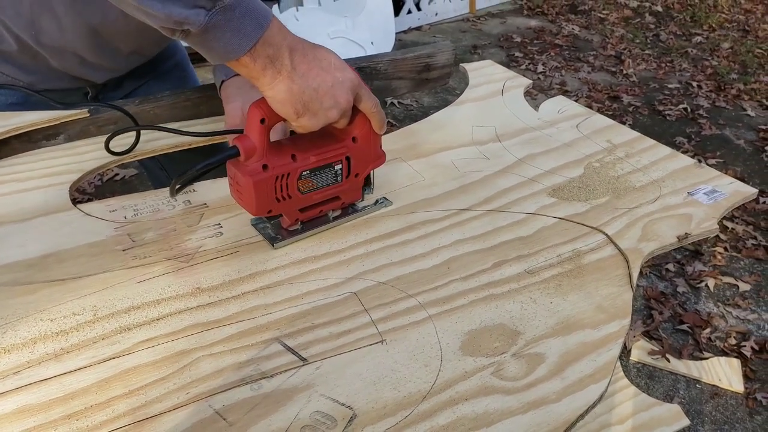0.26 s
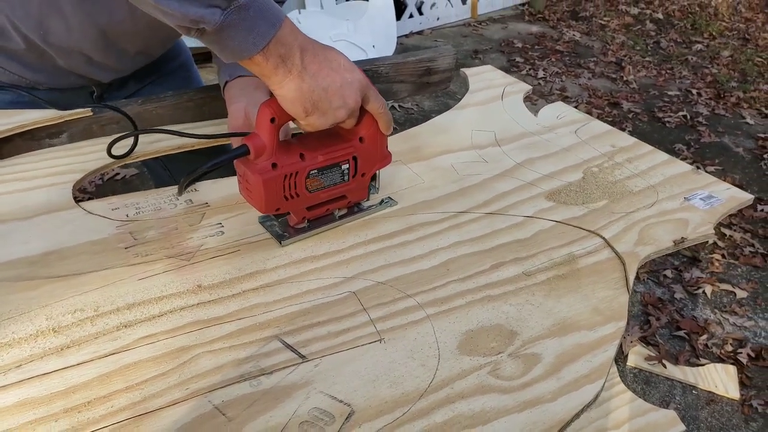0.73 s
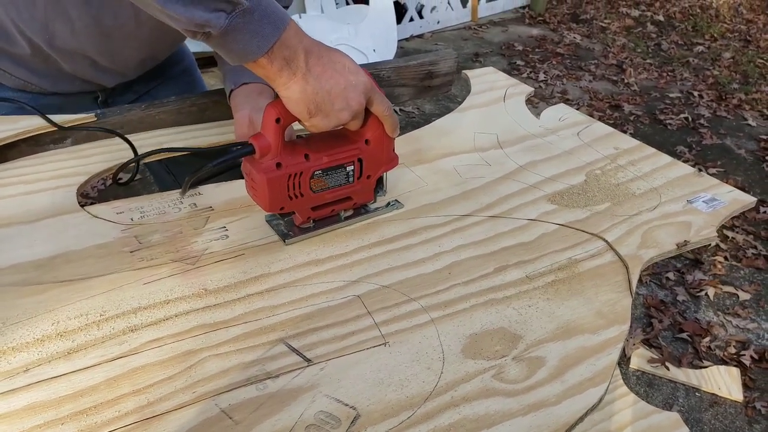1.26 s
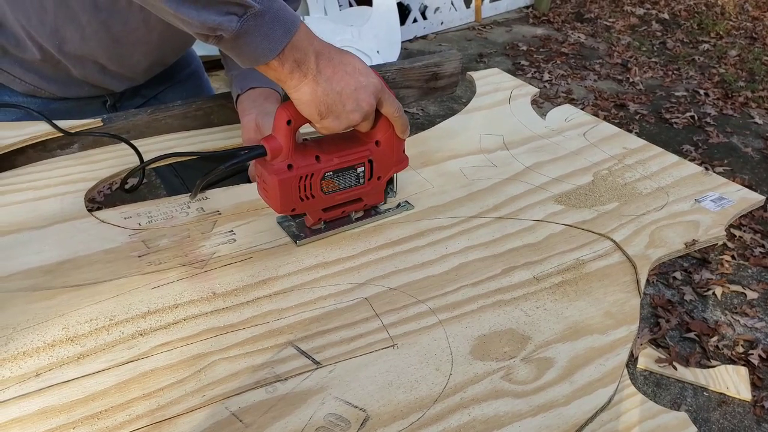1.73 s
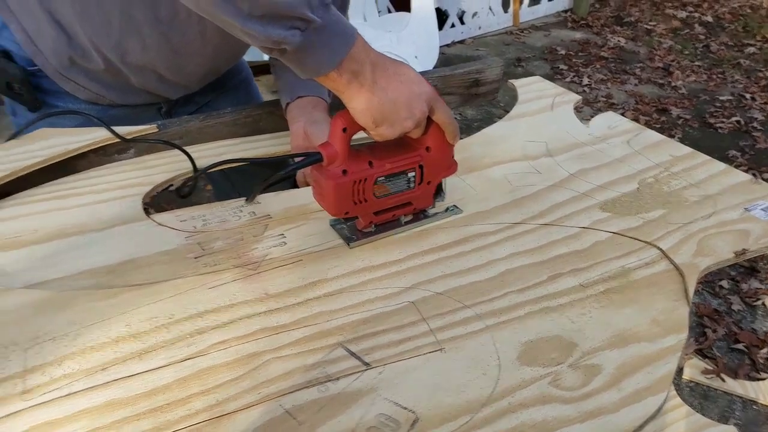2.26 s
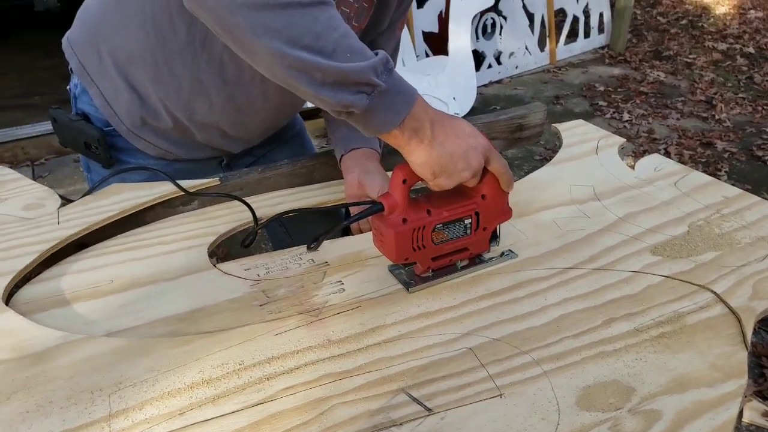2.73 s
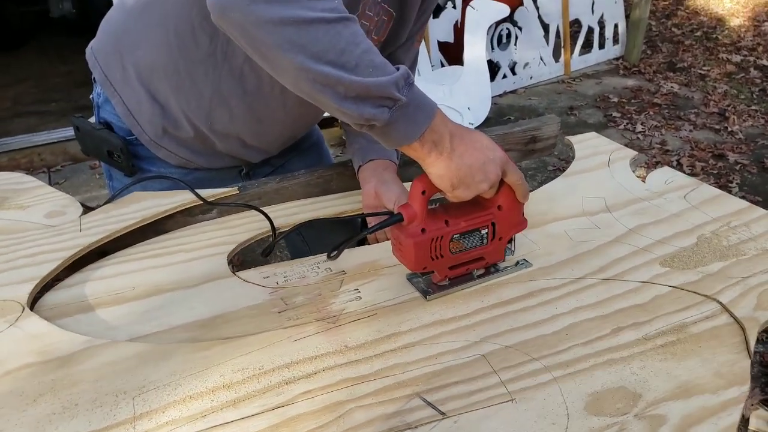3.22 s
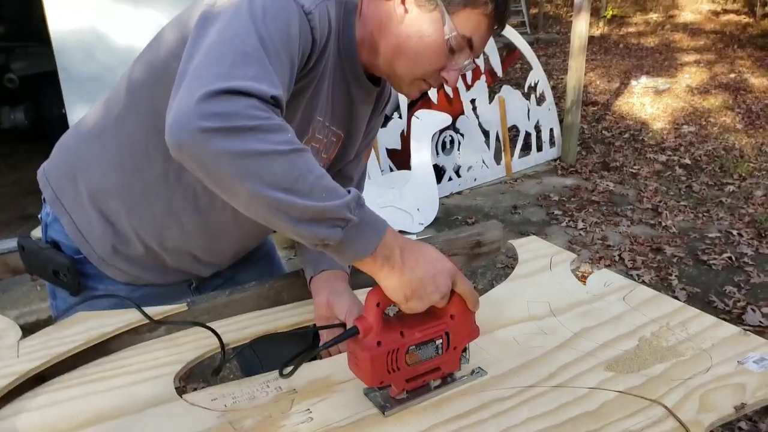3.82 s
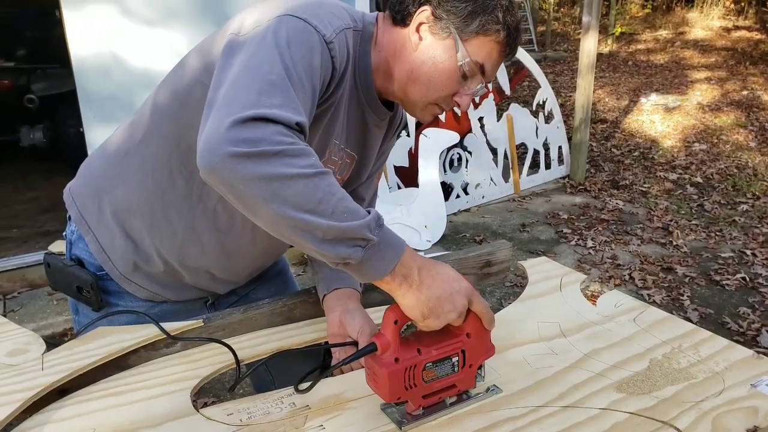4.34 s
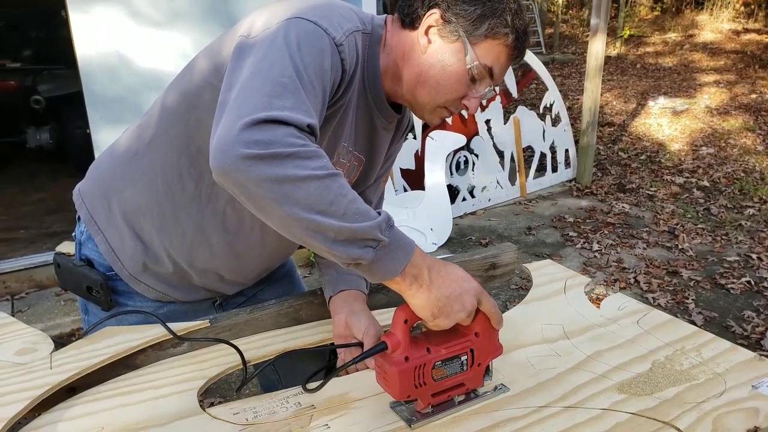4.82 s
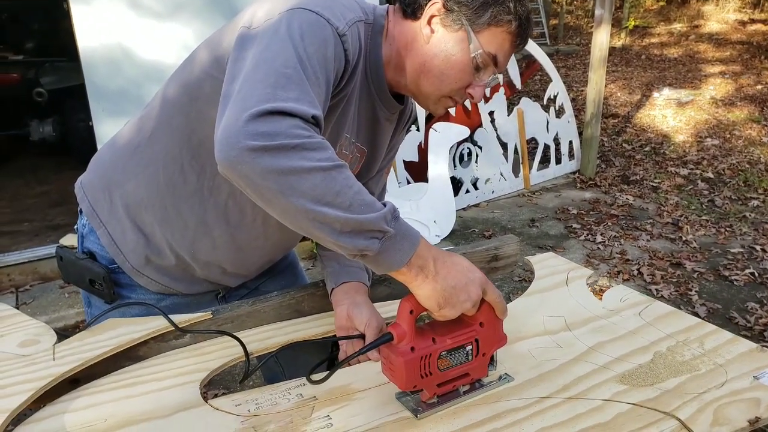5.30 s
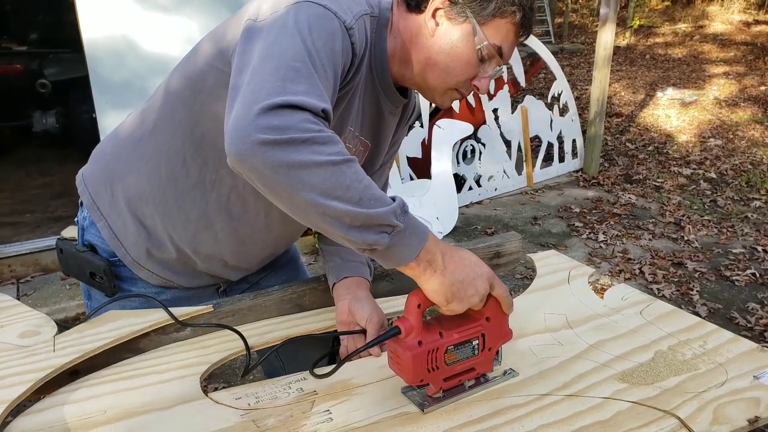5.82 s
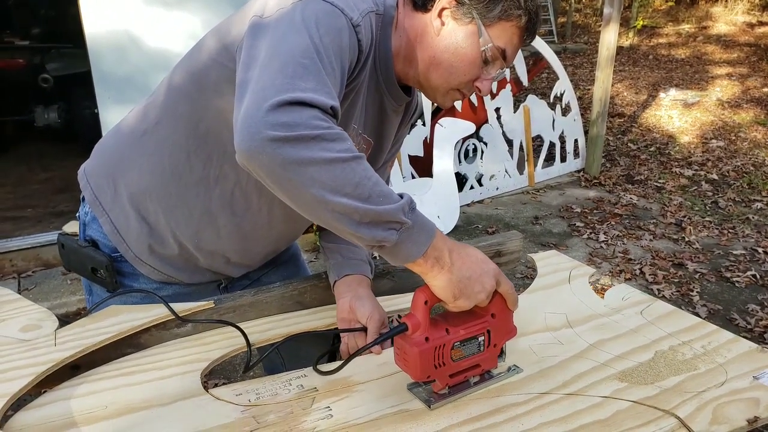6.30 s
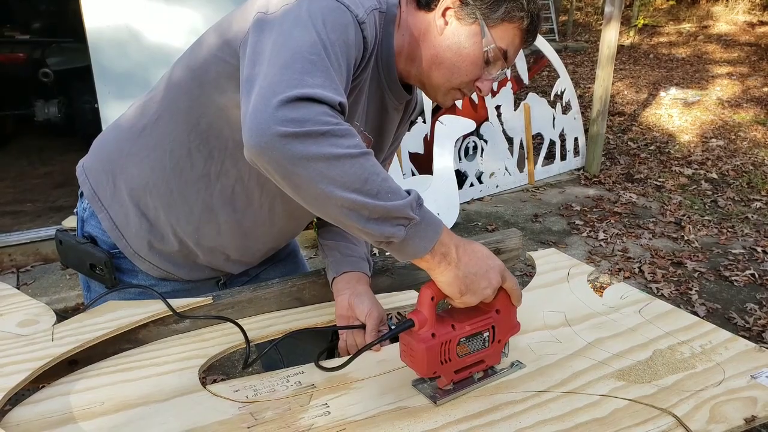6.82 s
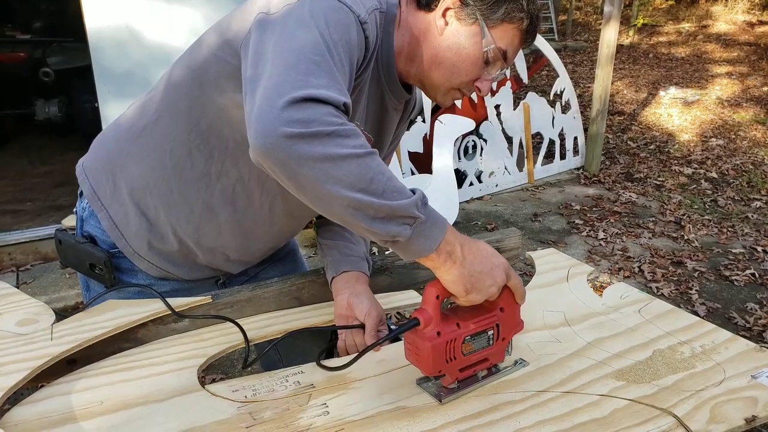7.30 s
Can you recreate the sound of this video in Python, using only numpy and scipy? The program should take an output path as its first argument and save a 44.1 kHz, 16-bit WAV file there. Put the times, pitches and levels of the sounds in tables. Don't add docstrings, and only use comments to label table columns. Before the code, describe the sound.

A corded jigsaw buzzes and whines loudly without stopping, rasping through a plywood sheet outdoors, its motor dipping slightly under load.

```python
import sys
import numpy as np
from scipy import signal
from scipy.io import wavfile
from scipy.ndimage import map_coordinates

SR = 44100
rng = np.random.default_rng(int(sys.argv[2]) if len(sys.argv) > 2 else 0)


def ratio_of_db(decibels):
    return 10 ** (np.asarray(decibels, float) / 20)


def store_pcm(level_fs):
    pcm = np.round(np.clip(level_fs, -1, 1) * 32767).astype(np.int16)
    wavfile.write(sys.argv[1], SR, np.atleast_2d(pcm).T)


N = 332955
MOTOR_TEETH, STROKE_TEETH = 5, 46
SHAFT = STROKE_TEETH / MOTOR_TEETH
FRAME = 2048

# t/s, shaft speed f/Hz, 4th shaft order/dB, 8th shaft order/dB, shaft/dB,
# 3rd stroke order/dB, shoe knock/dB, sheet ring/dB
MOTOR_RUN = [(0.0, 496, -25.5, -32, -40.0, -45, -59, -34.5),
             (0.2, 495.0, -25.5, -31, -41, -46.0, -52, -37.5),
             (0.4, 495, -26.5, -34, -42.0, -44.0, -48, -33.5), (0.48, 493.4, -23, -32, -42, -44, -56, -33),
             (0.56, 490.8, -30, -33, -41.0, -48, -34, -33), (0.7, 486.8, -25, -39, -36, -44.0, -38, -33),
             (0.85, 484.5, -26.5, -41, -43, -50, -40, -31.5), (0.95, 486, -28.0, -34.0, -35, -45, -42, -30),
             (1.05, 489.3, -24.5, -34.0, -37.0, -51, -44, -33),
             (1.2, 493.4, -25, -36.0, -37.5, -44.5, -47, -35.5),
             (1.35, 494.0, -25, -35, -37.5, -48, -55, -33),
             (1.6, 495.2, -25.5, -34, -35.5, -45.5, -53, -36.5),
             (1.8, 495.5, -25.5, -39, -38.0, -49, -63, -34.5), (2.0, 495, -23, -46, -37, -46, -47, -33.5),
             (2.2, 494.9, -26.0, -39, -37.0, -48, -58, -34.0),
             (2.4, 493.6, -29, -30.5, -38.5, -52, -55, -34), (2.6, 492.5, -36, -24, -40.0, -46, -57, -37),
             (2.8, 493.6, -31, -29, -42, -49, -65, -31.5), (3.0, 491.0, -31, -26, -44, -49, -54, -35),
             (3.2, 489.3, -29.0, -25.5, -45, -51.0, -51, -35.5),
             (3.4, 488, -27.5, -27.5, -45, -53, -49, -33.5),
             (3.6, 483.3, -31.5, -28.5, -46.0, -51.0, -48, -31),
             (3.78, 483.8, -31, -36, -46, -54, -52.0, -32),
             (3.86, 480.3, -35.0, -28, -48.0, -47.0, -39, -31),
             (4.0, 480.7, -31.5, -34.0, -49.0, -50, -40.5, -35),
             (4.15, 482.3, -35, -27, -52, -50.0, -41, -32.5),
             (4.3, 484.4, -30.5, -29, -49, -58, -52, -31.5), (4.5, 487, -30.5, -22.5, -52, -55, -54, -32.5),
             (4.7, 489, -33.0, -25, -51, -53.0, -47, -33.0), (4.9, 489.2, -32, -25.5, -49, -51, -48, -30.5),
             (5.1, 490, -32, -22.5, -52, -50.0, -46, -31), (5.3, 490, -32.0, -24, -45, -50.0, -46, -28.0),
             (5.5, 489.2, -33.5, -23, -43.0, -49.0, -45, -26.5),
             (5.7, 488.4, -33, -24.5, -41, -49.0, -43.5, -27.0),
             (5.9, 488.5, -32, -23, -43.5, -52, -46, -31), (6.1, 491, -33, -23, -42.0, -50, -44.5, -29.5),
             (6.3, 487, -32.5, -22, -40.0, -49, -45, -33.5),
             (6.5, 490.2, -30.0, -24.5, -41.0, -51.0, -45, -33),
             (6.7, 489, -33, -22, -39.0, -50.0, -45, -37), (6.9, 490.6, -33, -24, -40.0, -49.0, -44, -32),
             (7.1, 490.2, -31, -21, -40.0, -49.0, -46, -36.0),
             (7.3, 491.5, -31, -24.5, -39, -50.0, -47, -36),
             (7.55, 491, -30.5, -26, -40.5, -49.0, -45, -31)]
# t/s, sheet level/dB, casing level/dB, fan level/dB
NOISE_LEVELS = [(0.0, -32, -25.5, -27.5), (0.02, -19.5, -24, -27), (0.06, -27, -22.5, -27.5),
                (0.21, -21.5, -22.5, -27.5), (0.4, -25, -23.5, -28), (0.55, -19.5, -21.5, -27),
                (0.57, -23, -22.5, -27), (0.65, -25, -22, -26.5), (0.69, -18.5, -22, -28),
                (0.73, -24, -22, -27), (0.8, -21, -22, -27), (0.84, -23, -22.5, -28),
                (1.01, -22, -22, -27.5), (1.11, -25.5, -21.5, -27.5), (1.22, -21.5, -23, -27),
                (1.49, -26, -21, -26), (1.53, -22.5, -23, -27.5), (1.74, -24.5, -21.5, -26.5),
                (2.12, -23, -21.5, -26.5), (2.27, -26, -23, -27.5), (2.54, -25, -18.5, -28.5),
                (2.63, -27.5, -22, -28), (2.69, -25.5, -20, -28), (2.78, -27.5, -21, -31),
                (3.34, -28.5, -24.5, -31), (3.41, -30.5, -24, -30.5), (3.91, -27.5, -24.5, -31.5),
                (4.25, -28.5, -25, -31), (4.64, -26.5, -24.5, -29.5), (4.67, -30, -24, -30),
                (4.86, -26.5, -23.5, -29), (5.22, -26, -22.5, -27.5), (5.64, -25.5, -23, -29.5),
                (5.78, -26, -23.5, -29.5), (7.11, -26.5, -23, -29.5), (7.49, -24.5, -23, -30),
                (7.55, -24.5, -23.5, -30)]
# t/s, turned away/0-1, left delay of casing/ms, left delay of fan vents/ms,
# f/Hz where the sheet's reflection adds
CAMERA_SWING = [(0, 0.01, -0.049, -0.097, 2320), (1.25, 0.05, -0.054, -0.092, 2380),
                (1.9, 0.03, -.055, -.08, 2450), (2.2, 0.11, -0.026, -0.071, 2480),
                (2.32, 0.28, 0.067, 0.013, 2510), (2.5, 0.2, 0.11, 0.032, 2551),
                (2.75, 0.52, 0.098, 0.066, 2600), (3.25, 0.55, 0.11, 0.064, 2700),
                (3.5, 0.74, 0.11, 0.052, 2730), (3.75, 0.68, 0.1, 0.014, 2770),
                (4.25, 0.88, 0.13, .045, 2799), (5, 1, 0.12, 0.052, 2850), (6.5, 1, 0.14, 0.062, 2900),
                (7.55, 0.94, 0.15, 0.066, 2898)]
# f/Hz, facing level/dB, turned-away level/dB,
# facing left-right/dB, turned-away left-right/dB
SHEET_COLOUR = [(60, -17, -25, 2, -1), (100, -11, -22, 1, 2), (152, 5, -0.5, 2, -6),
                (230, -16, -13.5, 1, -2), (320, -5, -2.5, -1, 0), (445, 6, -1.5, -1, -5),
                (627, 9.5, 2, -2, -5), (720, 17, 13, -5, 0), (810, 17.5, 19.5, -2, -1),
                (900, 11, 13, 0, -1), (1060, 24.5, 7, -2.5, -2), (1210, 15.5, 12, -5, -1.5),
                (1440, 13.5, 15, -1, -2.5), (1660, 12, 8.5, 0, -1)]
CASING_COLOUR = [(1726, 8.3, 11, -10, 2), (2200, 18.3, 17, -8, 0), (2450.0, 18.2, 13, -0.5, -6.5),
                 (2850.0, 15.2, 18, -2, -2.0), (3200, 18.5, 15.5, -1.5, -7), (3520, 15, 14, -9.5, -6.5),
                 (3800, 9.6, 14, -3, -11), (4340, 14.2, 5.5, -5.5, -15.5), (5100, 9.7, 8.5, -3.5, -11),
                 (5750, 8.4, 2.5, -7.5, -6.5), (6870, 5.2, -2.5, -4, -14.5)]
FAN_COLOUR = [(7000, 2.5, -4, -2, -5.5), (7800, 2.5, 1, -8, -8), (8400, 6, 7.5, -5, -3.5),
              (9200, 6, 4, -0.5, -1.5), (10300, 5, 3, 0, -2), (11600, 9, 2.5, -5, -4),
              (12800, 7, 3, -2, -2), (14000, 4.5, 0, -3, -1), (15200, 4, -5, 3, 5), (15900, -1, -12, 0, 0),
              (16150, -60, -66, 0, 0)]
# stroke order/count, facing level/dB, turned-away level/dB, left-right/dB
KNOCK_ORDERS = [(2, -12.5, -34, 9), (4, -14, -36, 12), (5, -6, -4, 1), (6, -12.5, -8, 3), (7, -9, -9.5, -3),
                (8, -22, -20, -2.0), (9, -13, -14, -1), (10, -11, -16.5, 3)]
RING_ORDERS = [(11, -7, -22, 0), (12, -19, -23.5, -2), (13, -7.5, -21, 5), (14, -3, -4, -4),
               (15, -8, -3.5, -3.5), (17, -9, -17.5, 0.0), (18, -13, -17, -1.0), (19, -2.5, -17.5, -2.0),
               (20, -0.5, -21, -5), (21, -3, -19, -5), (22, 0, -16, 3)]
GEAR_MIXES = [(1, -2), (1, -1), (1, 1), (1, 2), (1, 3), (1, 4), (1, 6), (2, 0), (3, 0), (5, -2), (5, -1),
              (5, 0), (5, 2), (6, -2), (6, 0), (12, 0)]
# facing level/dB, turned-away level/dB, left-right/dB
GEAR_MIX_LEVELS = [(-53, -57.5, -5), (-48, -65, -2), (-42.5, -57, -7), (-50, -57, 0), (-48, -53, -4),
                   (-42.5, -54, -2), (-47, -42, 0), (-37, -45.5, -1), (-40.5, -40, 3), (-41, -39, 4),
                   (-35.5, -37, 1), (-37, -47, -4), (-36, -37.5, -4), (-40, -41, 3), (-40, -39, 0),
                   (-47, -48, -9)]


def curves(rows, t):
    times, *columns = np.transpose(rows)
    return [np.interp(t, times, column) for column in columns]


def unit(x):
    return x / np.sqrt(np.mean(x ** 2) + 1e-20)


def wobble(rate):
    knots = rng.standard_normal(int(N * rate / SR) + 4)
    return map_coordinates(knots, [np.arange(N) * rate / SR])


def tone(order, strokes, db, pan_db, unsteady_db, slip):
    lag_s = curves(CAMERA_SWING, np.arange(N) / SR)[1] / 1000
    lag = lag_s * np.gradient(strokes) * SR
    at_each_mic = strokes + [-lag / 2, lag / 2]
    phase = 2 * np.pi * (order * at_each_mic + rng.random()) + slip * wobble(12)
    level_db = db + unsteady_db * wobble(9) + [[pan_db / 2], [-pan_db / 2]]
    return np.sqrt(2) * ratio_of_db(level_db) * np.sin(phase)


def orders(table, strokes, db, away, unsteady_db, slip):
    total = 0
    for order, near, far, pan_db in table:
        level_db = db + near + away * (far - near)
        total = total + tone(order, strokes, level_db, pan_db, unsteady_db, slip)
    return total


def gears(strokes, away, fourth_db, eighth_db, shaft_db):
    whine = tone(4 * SHAFT, strokes, fourth_db, 0.1, unsteady_db=1.0, slip=0.2)
    brush_chatter = unit(ratio_of_db(3.0 * wobble(160)))
    eighth = tone(8 * SHAFT, strokes, eighth_db - 1.5, -6, unsteady_db=0.8, slip=0.4)
    whine = whine + brush_chatter * eighth
    whine = whine + tone(SHAFT, strokes, shaft_db, -1.5, unsteady_db=-0.5, slip=0.14)
    mixes = []
    for (turns, extra), levels in zip(GEAR_MIXES, GEAR_MIX_LEVELS):
        mixes.append((SHAFT * turns + extra, *levels))
    return whine + orders(mixes, strokes, -1.6, away, unsteady_db=2.5, slip=0.37)


def reversals(strokes, scatter_db, uneven_db):
    ends = np.flatnonzero(np.diff(np.floor(2 * strokes)))
    every_other = np.arange(len(ends)) % 2
    slaps = np.zeros(N)
    slaps[ends] = ratio_of_db(scatter_db * rng.standard_normal(len(ends)) - uneven_db * every_other)
    return slaps


def rasp(strokes, slaps, once_db, clack, clack_s, grit_db, grit_rate, surge_db):
    swing_db = once_db * np.cos(2 * np.pi * strokes + 0.5 * wobble(30))
    fade = np.exp(-1 / (SR * clack_s))
    burst = signal.lfilter([1], [1, -fade], slaps)
    level_db = swing_db + grit_db * wobble(grit_rate) + surge_db * wobble(11)
    return unit(ratio_of_db(level_db) * (1 + clack * burst) * rng.standard_normal((2, N)))


def heard(force, colour, db, alike, vents=False, ridge_db=0):
    turn = np.arccos(np.clip(alike, 0, 1)) / 2
    shared, scattered = force[0], np.array([force[1], -force[1]])
    pair = np.cos(turn) * shared + np.sin(turn) * scattered
    hz, t, spectrum = signal.stft(pair, SR, nperseg=FRAME)
    away, *lags_ms, ridge_hz = curves(CAMERA_SWING, t)

    f, *columns = np.transpose(colour)
    near, far, near_pan, far_pan = [np.interp(np.log(hz + 1), np.log(f), c)[:, None] for c in columns]
    octaves_outside = np.abs(np.log2((hz + 1) / np.clip(hz + 1, f[0], f[-1])))[:, None]
    gain = ratio_of_db(near + away * (far - near) - 60 * octaves_outside)
    ridge = 1 / (1 + ((hz[:, None] - ridge_hz) / 180) ** 2)
    gain = gain * ratio_of_db(ridge_db * ridge)
    gain = gain / np.sqrt(np.mean(gain ** 2, 0))

    delay = np.exp(-1j * np.pi * hz[:, None] * lags_ms[int(vents)] / 1000)
    half = ratio_of_db((near_pan + away * (far_pan - near_pan)) / 2) * delay
    sound = signal.istft(spectrum * gain * [half, 1 / half], SR, nperseg=FRAME)[1]
    return ratio_of_db(db) * sound[:, :N]


def cutting_noise(strokes, slaps, sheet_db):
    sheet = rasp(strokes, slaps, once_db=2.0, clack=0.35, clack_s=0.003, grit_db=1.5, grit_rate=110, surge_db=0.4)
    return heard(sheet, SHEET_COLOUR, sheet_db - 1.0, alike=0.65)


def casing_rattle(strokes, slaps, casing_db):
    casing = rasp(strokes, slaps, once_db=0.2, clack=1.2, clack_s=0.0011,
                  grit_db=0.83, grit_rate=350, surge_db=0.26)
    casing[0] += 0.39 * unit(slaps)
    return heard(casing, CASING_COLOUR, casing_db + 2.5, alike=0.72, ridge_db=5)


def fan_hiss(strokes, slaps, fan_db):
    fan = rasp(strokes, slaps, once_db=0.6, clack=0.59, clack_s=0.0015, grit_db=1.0, grit_rate=500, surge_db=-0.5)
    return heard(fan, FAN_COLOUR, fan_db + 2.5, alike=0.6, vents=True)


def strokes_on_sheet(strokes, slaps, away, third_db, knock_db, ring_db):
    hum = tone(3, strokes, third_db, 0.85, unsteady_db=-0.1, slip=0.15)
    knocks = orders(KNOCK_ORDERS, strokes, knock_db, away, unsteady_db=2.5, slip=0.23)
    rings = orders(RING_ORDERS, strokes, ring_db - 0.5, away, unsteady_db=2.5, slip=0.48)
    force = rasp(strokes, slaps, once_db=-2.5, clack=0.35, clack_s=0.003, grit_db=3.0, grit_rate=40, surge_db=1.0)
    thud_colour = [(95, 0, -15, 1, 1), (263, 3, 4, 0, 0), (419.75, -6, 0, 0.1, 0)]
    thud = heard(force, thud_colour, knock_db - 5.5, alike=0.2)
    return hum + knocks + rings + thud


def scene():
    t = np.arange(N) / SR
    shaft_hz, fourth_db, eighth_db, shaft_db, third_db, knock_db, ring_db = curves(MOTOR_RUN, t)
    sheet_db, casing_db, fan_db = curves(NOISE_LEVELS, t)
    away = curves(CAMERA_SWING, t)[0]
    strokes = np.cumsum(shaft_hz) / SR / SHAFT
    slaps = reversals(strokes, scatter_db=2.2, uneven_db=3.5)

    mix = gears(strokes, away, fourth_db, eighth_db, shaft_db)
    mix = mix + cutting_noise(strokes, slaps, sheet_db)
    mix = mix + casing_rattle(strokes, slaps, casing_db)
    mix = mix + fan_hiss(strokes, slaps, fan_db)
    return mix + strokes_on_sheet(strokes, slaps, away, third_db, knock_db, ring_db)


def band_limit(x):
    return signal.sosfilt(signal.butter(12, 16670, fs=SR, output="sos"), x)


def record(dry):
    top = 0.93
    soft = dry / (1 + np.abs(dry / top) ** 6) ** (1 / 6)
    return band_limit(soft)


dry = scene()
out = record(dry)
store_pcm(out)
```